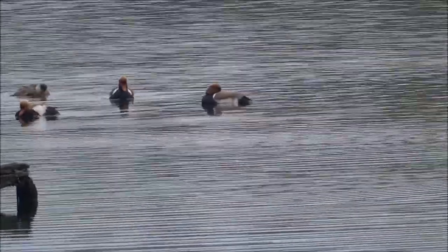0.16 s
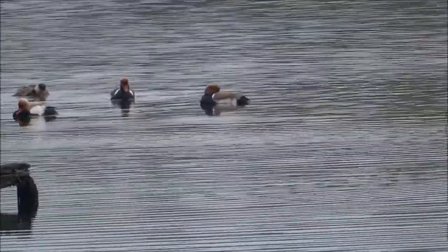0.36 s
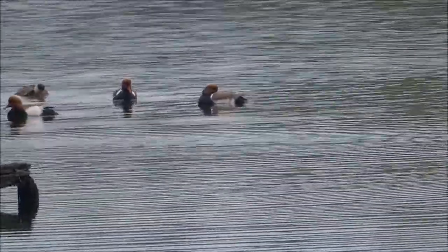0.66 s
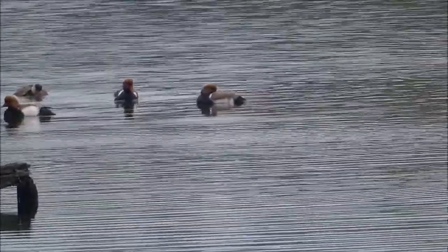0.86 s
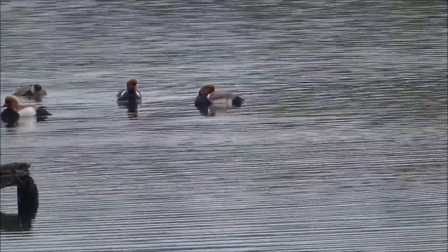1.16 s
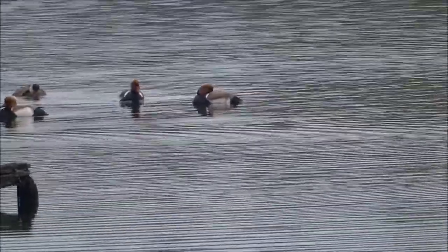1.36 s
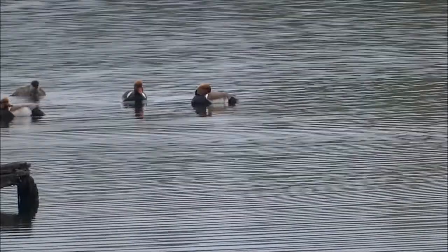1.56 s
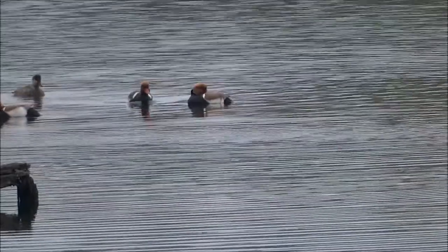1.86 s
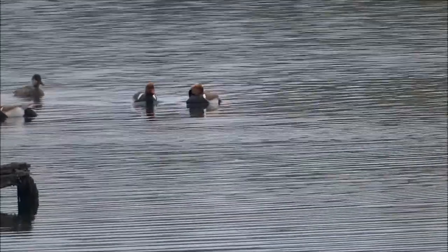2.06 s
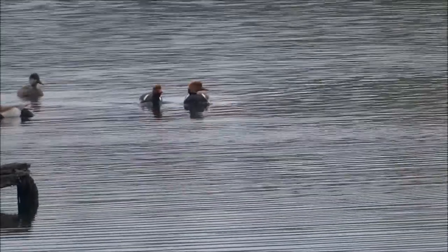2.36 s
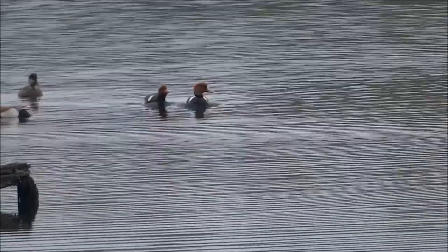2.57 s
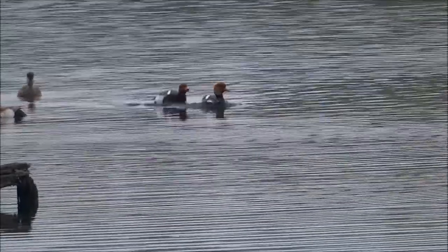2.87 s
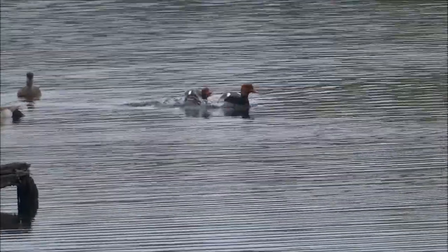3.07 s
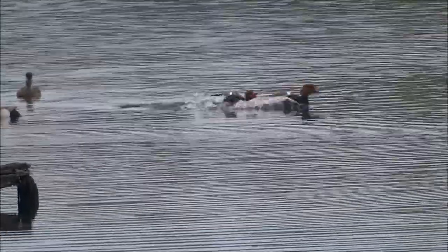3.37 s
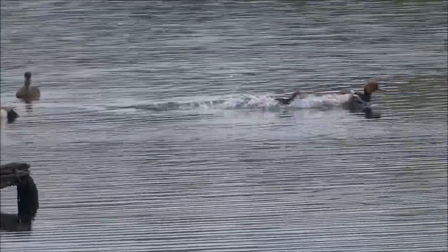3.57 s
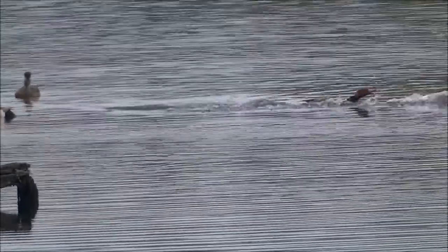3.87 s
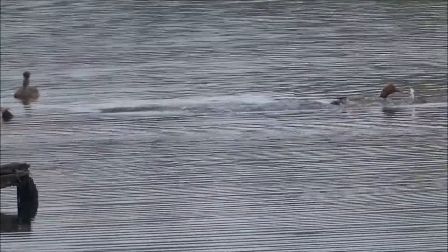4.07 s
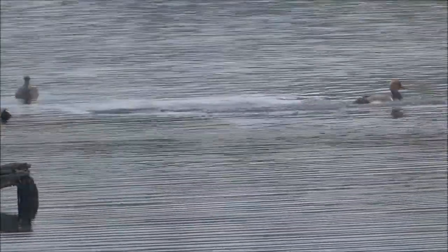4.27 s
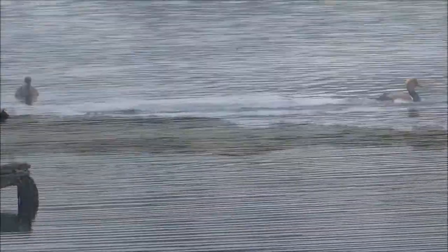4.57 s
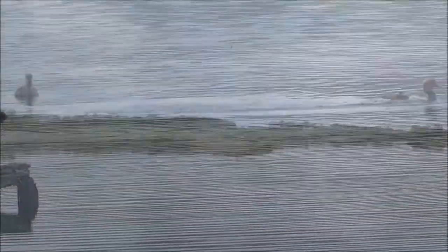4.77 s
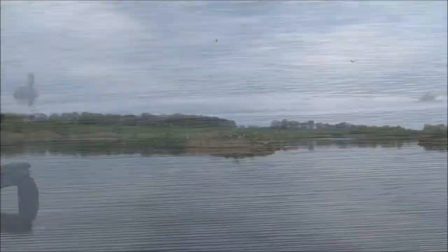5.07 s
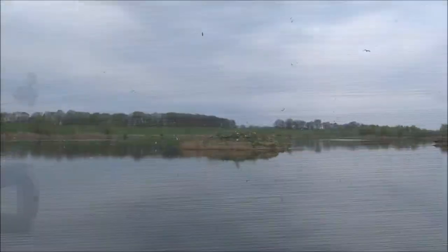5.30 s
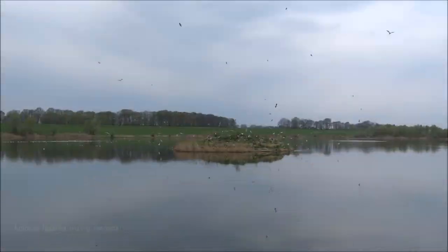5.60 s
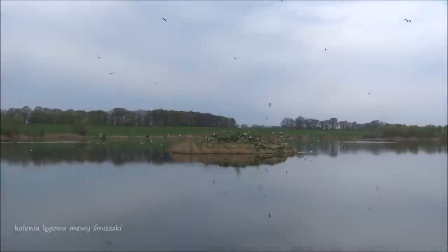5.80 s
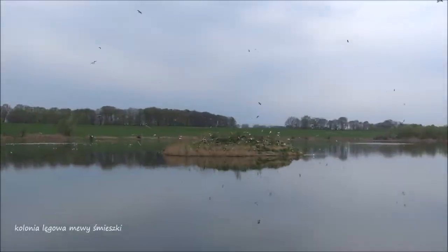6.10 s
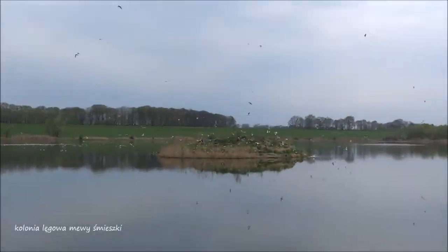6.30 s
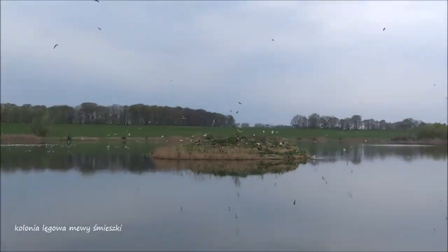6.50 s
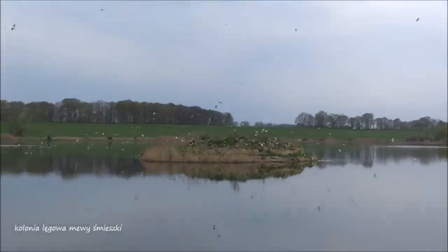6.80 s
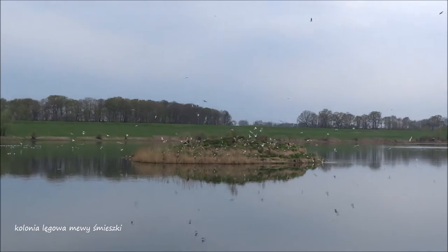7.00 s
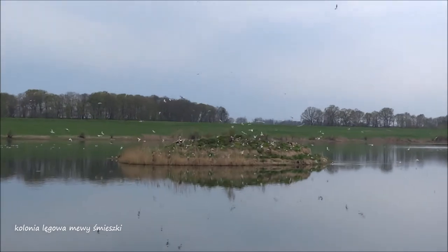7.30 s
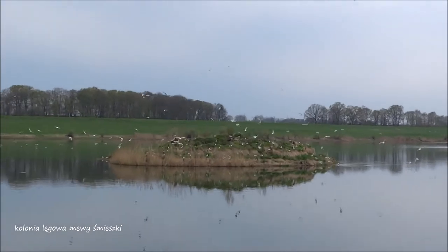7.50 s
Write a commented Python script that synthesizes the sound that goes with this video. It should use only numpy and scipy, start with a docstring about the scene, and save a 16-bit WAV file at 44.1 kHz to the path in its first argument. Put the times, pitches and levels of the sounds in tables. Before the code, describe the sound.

Gulls call continuously from a breeding island across open water, first quiet and far off, with scattered harsh cries standing out. High, soft songbird chirps and a steady thin whistle pass before the middle. Then the chorus swells within a moment, brighter and thicker, with stronger airy rush and louder nearby screeches. Fairly narrow stereo, slight left lean, faint scattered echoes from reeds and trees.

```python
"""A gull colony on a reed island, heard across a lake by two close microphones.
From the start a thin, distant chorus of overlapping rasping calls lies over low rumble and soft air noise.
Nearer gulls stand out with arched, rattling overtone cries and harsh hissing screeches; one mew droops at 1.3 s.
From 2.7 s a songbird gives five falling sine chirps, then a thin whistle on two close pitches.
Just after 4 s the chorus swells and fills out, the rush of air with it; the nearer birds echo faintly from the shore."""
import sys
import numpy as np
from scipy import signal
from scipy.fft import rfft, irfft, next_fast_len
from scipy.io import wavfile
from scipy.ndimage import uniform_filter1d

SR = 44100
rng = np.random.default_rng(int(sys.argv[2]) if len(sys.argv) > 2 else 0)


def inscribe(sig):
    """Save sig as 16-bit PCM at rate SR to the path in sys.argv[1].

    A 1-D sig is mono; a 2-D sig holds one channel per row.
    Samples are clipped to [-1, 1] before scaling.
    """
    pcm = np.round(np.clip(np.atleast_2d(sig).T, -1, 1) * 32767)
    wavfile.write(sys.argv[1], SR, pcm.astype(np.int16))


N = 337353
TIME = np.arange(N) / SR

# How hard the distant colony calls, thin and then full; only the swings about the mean are used.
# Each row: time in seconds, level in dB.
FAR_CHORUS = [(0.0, -39), (0.39, -48.5), (0.5, -44.5), (1.27, -53), (1.34, -38.5), (1.7, -46), (1.87, -49),
              (1.94, -55), (2.03, -44.5), (2.27, -41.5), (3.14, -43), (3.18, -56.5), (3.74, -43),
              (3.81, -56), (4.04, -48.5), (4.05, -48)]
FULL_CHORUS = [(4.2, -37), (5.17, -37.5), (5.66, -37.5), (5.75, -39.5), (6.87, -37), (7.01, -37),
               (7.23, -38.5), (7.49, -34), (7.65, -38)]
# Colour of the two choruses. Each row: frequency in Hz, relative level in dB per Hz.
FAR_COLOUR = [(380, -52), (550, -23), (700, -25.5), (850, -24), (1050, -13), (1280, -13.5), (1600, 1),
              (1900, 1.5), (2200, -1.5), (2500, -8), (2900, -12), (3600, -16), (4700, -15), (6500, -25),
              (8000, -34), (10500, -56)]
FULL_COLOUR = [(500, -26), (900, -15.5), (1400, -11), (1700, 1), (2150, 1), (2450, -3), (2680, -0.5),
               (3050, -4), (3550, -4), (3820, -9.5), (4120, -4.5), (4400, -13), (4650, -10.5),
               (5400, -12.5), (5700, -14), (6100, -12.5), (6600, -18.5), (7600, -19), (9200, -34),
               (11000, -36.5)]
# Air and rumble over the lake under each chorus. Each row: frequency in Hz, relative level in dB per Hz.
FAR_AIR = [(15, -43.5), (25, -17), (40, -17.5), (59, -3.5), (86, -13), (119, -8.5), (141, -16.5),
           (178, -11.5), (198, -23.5), (361, -24), (523, -9), (793, -9), (1000, -9), (1300, -8),
           (2200, -120)]
FULL_AIR = [(15, -45), (25, -18), (70, -10.5), (130, -12), (172, -21), (323, -33.5), (426, -21.5),
            (500, -5), (882, -3), (1110, -0.5), (1200, -4), (1560, 6), (2640, -120)]
# Stereo width at the microphones. Each row: frequency in Hz, gain of the side signal in dB.
WIDTH = [(50, -31), (130, -14), (330, -4.5), (700, -12), (1400, -13), (2800, -17.5), (5600, -13.5),
         (9000, -10)]
# The loudest single cries. Each row: start in seconds, length in seconds, pitch in Hz, glide and arch as
# shares of the pitch, level in dB before CRIES_DB, number of the overtone the throat lifts, rasp from 0 to 1.
CRIES = [(0.0, 0.14, 1034, -.16, 0.0083, -41.5, 2, 0.22), (.17, 0.2, 1176, -0.046, 0.04, -53, 3, 0.81),
         (0.289, .15, 1005, 0, .04, -59, 2, 0.78), (.36, .23, 1170, .17, .03, -52, 3, .6),
         (.56, .14, 950, -.04, .03, -40.5, 2, .35), (.65, .15, 850, -.06, .03, -45, 2, .5),
         (.81, 0.15, 1180, .04, 0.024, -55, 3, 0.55), (0.821, 0.12, 888, .1, 0.031, -47, 2, 1),
         (.92, 0.12, 1076, 0.094, 0.045, -42.5, 2, 0.48), (.94, 0.15, 1175, -0.0096, 0.0022, -49.5, 3, 1),
         (1.14, 0.14, 1290, -.03, 0.0024, -55, 4, .5), (1.151, 0.22, 1290, -0.052, 0.012, -52, 2, 0.53),
         (1.33, 0.1, 1057, 0, 0.076, -42, 2, 0.74), (1.72, 0.13, 970, -.03, 0.035, -43, 2, 0.77),
         (1.79, .12, 1043, .06, 0.041, -39, 2, 0.62), (1.76, .25, 1144, -.02, 0.0045, -56.5, 4, .5),
         (1.95, 0.078, 1210, 0.053, 0.028, -52, 3, 0.21), (1.99, .13, 985, 0.041, 0.012, -54, 4, 0.64),
         (2.0, 0.24, 935, 0.011, 0.034, -44, 2, 0.63), (2.17, 0.13, 1167, 0.047, .03, -47, 3, 0.82),
         (2.2, 0.17, 1017, -0.15, 0.037, -39.5, 2, 0.57), (2.37, .12, 890, -.03, 0.024, -40.5, 2, 0.66),
         (2.3, 0.22, 1276, -.02, .005, -54.5, 4, 0.41), (2.44, 0.16, 1284, 0.033, .02, -49, 2, 0.44),
         (2.56, .13, 1080, .08, .04, -38, 2, 0.92), (2.651, 0.15, 839, -.07, 0.032, -44, 2, 0.96),
         (2.78, 0.13, 930, .05, 0.026, -55, 2, 0.56), (2.934, 0.21, 950, -0.08, 0.015, -41, 2, 0.56),
         (2.96, 0.25, 1020, -.04, 0.035, -56, 4, 0.99), (3.09, 0.099, 1193, 0, 0.031, -57, 4, 0.58),
         (3.17, 0.096, 1044, -.28, 0.043, -49, 3, 0.69), (3.269, 0.33, 1040, .03, .02, -59, 4, 0.58),
         (3.299, 0.18, 986, -.04, 0.03, -47.5, 2, 1), (3.53, 0.16, 955, 0, 0.046, -42, 2, 0.9),
         (3.66, 0.21, 888, -0.11, .01, -47.5, 2, 0.15), (3.77, 0.12, 1207, .03, .02, -54, 3, 0.35),
         (3.84, 0.083, 1216, -.09, 0.029, -47, 3, 0.56), (3.849, 0.054, 1224, 0.018, 0.094, -45, 2, 0.97),
         (3.88, 0.19, 773, -.05, 0.0068, -51.5, 2, 0.54), (3.9, .19, 1140, .1, .03, -50.5, 3, .5),
         (4.05, .12, 1010, -.1, .02, -38, 2, .45), (4.14, .23, 890, -.1, .01, -35, 2, .55),
         (4.17, 0.31, 1446, -0.039, 0.023, -44, 3, 0.77), (4.2, 0.17, 1200, 0, 0.028, -47, 4, .5),
         (4.33, 0.2, 1330, -.01, .005, -39, 2, 0.39), (4.33, 0.13, 1340, 0, .005, -45, 4, 0.47),
         (4.421, .18, 1437, .02, 0.022, -46, 3, .44), (4.57, 0.15, 1413, -.02, .01, -46, 3, 0.35),
         (4.609, .12, 1056, 0, 0.039, -37, 2, 0.87), (4.751, 0.15, 1095, -0.019, 0.023, -42, 3, 0.69),
         (4.87, 0.16, 1333, -0.051, 0.0093, -38, 2, 0.26), (4.9, 0.093, 1240, -.01, 0.0044, -51, 5, 0.44),
         (5.12, 0.16, 1114, -0.031, 0.013, -45, 3, .8), (5.27, 0.16, 1074, -0.1, 0.014, -33, 2, 0.65),
         (5.36, 0.19, 1370, 0.0051, 0.0097, -39, 3, 0.8), (5.565, .135, 1105, 0, .07, -32, 2, .65),
         (5.71, 0.057, 1173, 0, 0.028, -41, 3, .4), (5.79, 0.24, 1360, -.02, 0.024, -51, 3, 0.5),
         (5.83, 0.16, 1175, 0, 0.03, -41, 3, 0.81), (5.95, 0.34, 1167, 0.016, 0.03, -40.5, 3, 0.79),
         (6.03, 0.16, 1273, 0, .01, -46, 4, .5), (6.18, 0.1, 1335, 0, 0, -45, 4, .5),
         (6.194, 0.079, 1200, -0.044, 0.041, -36, 2, 0.59),
         (6.25, 0.26, 1320, -0.016, 0.013, -40.5, 2, 0.83), (6.38, .2, 1352, -.038, .01, -41.5, 3, .5),
         (6.425, .05, 1080, .08, .06, -35, 2, .35), (6.44, .15, 1250, 0, .02, -47, 4, .6),
         (6.51, .05, 1045, -.04, .05, -37.5, 2, .35), (6.605, .05, 1150, .16, 0.026, -41, 2, 0.25),
         (6.62, 0.24, 1350, .02, 0.02, -50, 4, .6), (6.685, .045, 1060, -.1, 0.024, -40, 2, .35),
         (6.73, .26, 1195, .02, .015, -43.5, 3, .75), (6.87, .15, 1360, .02, .005, -47, 4, .4),
         (6.95, .16, 1345, .03, .01, -40.5, 3, .4), (6.95, .15, 1000, -.1, .03, -33.5, 2, .55),
         (7.105, .08, 1085, 0, .036, -34, 2, .55), (7.08, 0.11, 1365, -.03, 0.029, -44, 3, 0.4),
         (7.32, 0.12, 1072, .04, 0.024, -34, 2, 0.94), (7.35, 0.18, 1365, 0, .01, -47.5, 4, 0.44),
         (7.44, 0.074, 1090, 0.016, 0.028, -34.5, 2, 0.47), (7.47, 0.18, 1000, -.02, 0.015, -39, 2, 0.43)]
# Overtones of a screech, and weakly of a cry. Each row: frequency in Hz, relative level in dB.
VOICE = [(300, -40), (550, -26.5), (1100, -22.5), (2200, -7), (2900, 0), (3500, -9.5), (4200, -7.5),
         (5000, -7.5), (6000, -6), (6700, -14.5), (7300, -14.5), (8500, -22.5), (10500, -45.5)]
# Fall-off of a cry's upper resonance in the high treble. Each row: frequency in Hz, gain in dB.
BEAK_ROLLOFF = [(5400, -7.5), (7000, -13), (9500, -30)]
# Harsh screeches close by. Each row: start in seconds, length in seconds, pitch in Hz, glide and arch as
# shares of the pitch, level in dB, treble tilt in dB, rasp from 0 to 1, jitter as a share of the pitch.
SCREECHES = [(0.391, 0.2, 1207, 0.085, 0.005, -43, -1, 0.74, 0.008),
             (1.109, 0.19, 1287, -0.01, 0.014, -56, 13, 0.94, 0.011),
             (1.28, 0.27, 1197, -0.069, 0.0104, -46.5, -2, 0.73, .02),
             (2.165, 0.18, 1257, 0.048, 0.041, -42.5, 0.5, 0.65, 0.013),
             (2.258, .13, 1315, -0.012, 0.0088, -44, 7, 0.61, 0.022),
             (2.521, 0.15, 1286, 0.0037, 0.017, -48, -10, 0.72, 0.023),
             (2.925, 0.21, 1128, 0.043, 0.016, -45, -17, 0.78, 0.031),
             (3.082, .18, 1185, 0.062, 0.01, -44.5, -1.5, 0.64, 0.018),
             (3.923, 0.21, 1187, .05, 0.02, -47, 5, 0.81, 0.013),
             (4.14, 0.26, 1075, -0.021, .016, -44, 8, 0.58, 0.027),
             (4.737, 0.204, 1093, .01, 0.015, -37, -12, 0.93, 0.0303),
             (5.381, 0.18, 1318, -0.012, 0.019, -34, -10, 0.61, 0.11),
             (6.136, 0.26, 1308, -0.00089, 0.015, -40, -1, 0.64, 0.046),
             (6.77, 0.28, 1203, -0.00039, 0.015, -37, -15, 0.67, 0.046),
             (7.346, .15, 1188, 0.042, 0.015, -40.5, 7, 0.42, 0.04)]
# One long drooping mew. The row: start in seconds, length in seconds, pitch at the start, middle and end
# in Hz, level in dB before it fades.
MEW = (1.33, .46, 1090, 1120, 925, -42)
# Overtones of the mew. Each row: frequency in Hz, relative level in dB.
MEW_VOICE = [(300, -55), (550, -30), (1100, -7.5), (1700, -18), (2250, -1), (3400, -15), (4500, -11),
             (5700, -18), (9000, -55)]
# The songbird's falling chirps. Each row: start in seconds, level in dB before fading in and out.
CHIRPS = [(2.715, -59), (2.868, -54), (3.030, -51), (3.179, -51), (3.340, -54.5)]
# The full chorus swells in between these two times in seconds.
SWELL_S = (4.042, 4.143)

FAR_AIR_DB, FULL_AIR_DB = -64, -45.6
RATTLE_HZ = 66.84  # mean rate at which a rasping voice is chopped
STIR_DB, STIR_S = 3.5, 0.18  # a screech stirs the thin chorus: its treble rises for a moment
CRIES_DB = -0.9  # distance softens all the cries alike
FLUTTER_DB, FLUTTER_PER_S = 1.5, 60  # a cry's level flutters on its way across the water
SCREECH_HISS = 0.47  # share of the tone
MEW_TREMBLE_DB, MEW_FADE_DB_PER_S = 3, 13
WHISTLE_START_S, WHISTLE_LENGTH_S, WHISTLE_ATTACK_S, WHISTLE_RELEASE_S = 3.46, 0.59, 0.05, 0.14
WHISTLE_HZ, WHISTLE_GAP_HZ, WHISTLE_WAVER = 4985, 170, 0.0045  # waver as a share of the pitch
WHISTLE_DB, WHISTLE_LOWER_DB = -53.5, -2.5  # peak of the upper voice; the lower voice relative to it
CUTOFF_HZ = 11000


def from_db(db):
    """Decibels to gain."""
    return 10 ** (np.asarray(db) / 20)


def rms_one(x):
    """Scale to unit power."""
    return x / np.sqrt(np.mean(x ** 2) + 1e-20)


def at_hz(points, hz):
    """Read a spectrum on a log-frequency axis."""
    f, value = np.transpose(points)
    return np.interp(np.log(hz + 1e-3), np.log(f), value)


def colour(x, spectrum):
    """Give a steady sound a spectrum."""
    size = next_fast_len(N + 4096)
    gain = from_db(at_hz(spectrum, np.fft.rfftfreq(size, 1 / SR)))
    return irfft(rfft(x, size) * gain, size)[..., :N]


def band(x, low_hz, high_hz):
    """Band-pass."""
    return signal.sosfilt(signal.butter(2, [low_hz, high_hz], "band", fs=SR, output="sos"), x)


def wobble(t, per_s, size=1024):
    """Smooth chance with per_s new values a second."""
    return np.interp(t * per_s, np.arange(size), rng.standard_normal(size))


def add(track, s, sound):
    """Mix a sound in at time s, cut to the track's ends."""
    at = int(round(s * SR))
    first, last = max(at, 0), min(at + sound.shape[-1], N)
    if last > first:
        track[..., first:last] += sound[..., first - at:last - at]


def shore(x, t60, size=40000):
    """Sound scattered back by reeds and trees: a dense dying tail, different on each side."""
    tail = rng.standard_normal((2, size)) * from_db(-60 * np.arange(size) / SR / t60)
    return signal.fftconvolve(x[None], rms_one(tail) / np.sqrt(size), axes=1)[:, :N]


def widen(mid, side, left_db):
    """Two close microphones: nearly the same sound in both, the left louder by left_db."""
    return (mid + colour(side, WIDTH) * [[1], [-1]]) * from_db([[left_db / 2], [-left_db / 2]])


def arch(pitch_hz, glide, bend):
    """Pitch at start, middle and end: bend lowers both ends, glide tilts the line through them."""
    return pitch_hz * np.array([1 - bend - glide / 2, 1, 1 - bend + glide / 2])


def cry(length, pitches, rasp, throat, jitter, hoarse, half_db, edge, hiss=0):
    """One gull call: an arched overtone-rich tone; rasp chops it into a rattle, shakes it and makes it hoarse."""
    t = np.arange(int(max(length, .02) * SR)) / SR
    u = t / t[-1]
    rasp = np.clip(rasp, .02, 1)
    shake = jitter * rasp * (wobble(t, 498.0) + 0.5715 * wobble(t, 69.85))
    pitch = np.polyval(np.polyfit([0, .5, 1], pitches, 2), u) * (1 + shake)

    # the syrinx alternates strong and weak cycles, so the wave repeats at half the pitch
    k = np.arange(1, 21)
    strength = from_db(throat(k * pitches[1] / 2) + k % 2 * half_db)
    random_phase = np.exp(2j * np.pi * rng.random(len(k)))
    cycle = irfft(np.r_[0, strength * random_phase], n=4096)
    place = np.cumsum(pitch) / SR / 2 % 1
    tone = cycle[(place * len(cycle)).astype(int)]
    if hiss:
        throat_gain = from_db(throat(np.fft.rfftfreq(len(t), 1 / SR)))
        rush = irfft(rfft(rng.standard_normal(len(t))) * throat_gain, len(t))
        tone = rms_one(tone) + hiss * rms_one(rush)

    rate_hz = RATTLE_HZ * (1 + 0.047 * rng.standard_normal())
    beat = rate_hz * t + 0.15 * wobble(t, 36.5) + rng.random()
    rattle = 1 + 0.92 * rasp * np.cos(2 * np.pi * beat)
    roughness = 1 + hoarse * rasp ** 2 * wobble(t, 1100)
    swell = np.sin(np.pi / 2 * np.clip(np.minimum(u, 1 - u) / edge, 0, 1)) ** 2
    return rms_one(tone * rattle * roughness) * swell


def crowd(t0, t1, spread_db, rasp, wet_db, t60, throat_db, count, size=6):
    """Many gull calls, long and short, at varied levels and bearings, each with its own voice, as mid and side."""
    out = np.zeros((size, 2, N))
    for i, chances in enumerate(rng.random((count, 9))):
        when, span, key, rise, fall, harsh, near, bearing, gape = chances
        pitch_hz = 820 * (1450 / 820) ** key
        pitches = pitch_hz * np.array([1.04 - .26 * rise, 1, 1.01 - .22 * fall])

        def throat(hz):
            """Each bird holds its main resonance at another height."""
            centre_hz = 1600 * (5500 / 1600) ** gape
            return throat_db * np.exp(-(np.log2(hz / centre_hz) / 0.22) ** 2)  # width in octaves

        voice = cry(.08 + .24 * span, pitches, rasp + .5 * (harsh - .5), throat,
                    jitter=0.02467, hoarse=2.54, half_db=-3.5, edge=0.15)
        seat = np.array([[1], [np.sqrt(3) * (2 * bearing - 1)]])
        start_s = t0 + (t1 - t0) * (i + when) / count
        add(out[i % size], start_s, voice * from_db(spread_db * near) * seat)
    # each part of the colony has its own paths off the shore
    return sum(part + from_db(wet_db) * shore(part[0], t60, size=20000) for part in out)


def held(x, low_hz, high_hz):
    """Bring mid and side to a steady unit level, judged by the mid's power in a band."""
    power = uniform_filter1d(band(x[0], low_hz, high_hz) ** 2, SR // 5)
    return x / np.sqrt(np.maximum(power, 0) + 1e-3 * power.mean())


def chorus(voices, spectrum, curve, stirred_db, body_db, treble_db, body_follows, treble_follows, left_db):
    """The colony's din: throat resonance and harsh treble, each following how hard the birds call."""
    s, effort_db = np.transpose(curve)
    swing_db = np.interp(TIME, s, effort_db) - np.mean(effort_db)
    din = colour(voices, spectrum)
    low = colour(din, [(2600, 0), (3000, -6), (3600, -40)])
    body, treble = held(low, 1300, 2800), held(din - low, 2800, 5000)
    body = body * from_db(body_db + body_follows * swing_db)
    treble = treble * from_db(treble_db + treble_follows * swing_db + stirred_db)
    return widen(*(body + treble), left_db)


def air(spectrum, level_db, left_db):
    """Distant rumble and the soft rush of air over water and reeds: coloured noise."""
    mid, side = rms_one(colour(rng.standard_normal((2, N)), spectrum))
    return from_db(level_db) * widen(mid, side, left_db)


def near_cries():
    """Single birds above the din: arched cries with one overtone lifted by the throat."""
    out = np.zeros(N)
    for s, length, pitch_hz, glide, bend, db, overtone, rasp in CRIES:
        def throat(hz):
            """A main resonance, a weaker one an octave up, the fundamental and weak overtones."""
            def ring(multiple):
                """A resonance at this multiple of the pitch."""
                octaves = np.log2(hz / (multiple * pitch_hz))
                return 1 / (1 + (octaves / 0.099) ** 4)

            main = ring(round(overtone))
            upper = ring(2 * round(overtone)) * from_db(-12 + at_hz(BEAK_ROLLOFF, hz))
            fundamental = ring(0.91) * from_db(-19)
            overtones = from_db(-20 + at_hz(VOICE, hz))
            return 20 * np.log10(main + upper + fundamental + overtones)

        voice = cry(length, arch(pitch_hz, glide, bend), rasp, throat,
                    jitter=0.0221, hoarse=.8, half_db=-20, edge=.27)
        flutter_db = FLUTTER_DB * wobble(np.arange(len(voice)) / SR, FLUTTER_PER_S)
        add(out, s, from_db(db + CRIES_DB + flutter_db) * voice)
    return out


def screeches():
    """The closest gulls use the whole stack of overtones, with a puff of hiss in each beat of the rattle."""
    out = np.zeros(N)
    for s, length, pitch_hz, glide, bend, db, treble_db, rasp, jitter in SCREECHES:
        def beak(hz):
            """A wider beak lets out more treble."""
            return at_hz(VOICE, hz) + treble_db * at_hz([(2400, 0.16), (6000, 1.0)], hz)

        voice = cry(length, arch(pitch_hz, glide, bend), rasp, beak,
                    jitter=jitter, hoarse=.5, half_db=-13, edge=.33, hiss=SCREECH_HISS)
        add(out, s, from_db(db) * voice)
    return out


def stir():
    """Excitement of the neighbours, 0-1: a smooth bump around each screech."""
    bumps = [np.exp(-((TIME - s - length / 2) / STIR_S * 2) ** 2) for s, length, *_ in SCREECHES]
    return np.minimum(sum(bumps), 1)


def drooping_mew():
    """One nearer gull's long call: its pitch droops while its level trembles and weakens."""
    out = np.zeros(N)
    s, length, start_hz, middle_hz, end_hz, db = MEW
    voice = cry(length, (start_hz, middle_hz, end_hz), 0.52, lambda hz: at_hz(MEW_VOICE, hz),
                jitter=.026, hoarse=0.4, half_db=-19, edge=0.15, hiss=.28)
    age = np.arange(len(voice)) / SR
    level_db = db - MEW_FADE_DB_PER_S * age + MEW_TREMBLE_DB * wobble(age, 32.3)
    add(out, s, from_db(level_db) * voice)
    return out


def songbird(length=0.059, top_hz=7300, bottom_hz=5950):
    """Sine voices, slightly unsteady: five downward chirps, then a whistle that swells, holds and fades."""
    out = np.zeros(N)
    u = np.linspace(0, 1, int(length * SR))
    sweep_hz = top_hz * (bottom_hz / top_hz) ** u
    for s, db in CHIRPS:
        phase = 2 * np.pi * np.cumsum(sweep_hz * (1 + 0.012 * wobble(u * length, 260))) / SR
        add(out, s, from_db(db) * rms_one(np.sin(phase) * np.sin(np.pi * u ** 1.45)))

    waver = 1 + WHISTLE_WAVER * wobble(TIME, 28)  # shared by both voices

    def whistle(hz):
        """One voice with its own fine shake."""
        shaken_hz = hz * waver * (1 + 0.0026 * wobble(TIME, 120))
        return np.sin(2 * np.pi * np.cumsum(shaken_hz) / SR)

    age = TIME - WHISTLE_START_S
    ramps = np.minimum(age / WHISTLE_ATTACK_S, (WHISTLE_LENGTH_S - age) / WHISTLE_RELEASE_S)
    pair = whistle(WHISTLE_HZ) + from_db(WHISTLE_LOWER_DB) * whistle(WHISTLE_HZ - WHISTLE_GAP_HZ)
    return out + np.clip(ramps, 0, 1) * from_db(WHISTLE_DB) * pair


def scene():
    """The thinner chorus gives way to the full one; nearer birds echo faintly from the shore."""
    few = crowd(-.5, 4.3, spread_db=10, rasp=0.56, wet_db=-4, t60=0.45, throat_db=5, count=150)
    many = crowd(3.6, 7.8, spread_db=10, rasp=0.58, wet_db=-3, t60=0.5, throat_db=5, count=190)
    far = chorus(few, FAR_COLOUR, FAR_CHORUS, STIR_DB * stir(), body_db=-41.5, treble_db=-52.5,
                 body_follows=0.3, treble_follows=0.21, left_db=.5)
    full = chorus(many, FULL_COLOUR, FULL_CHORUS, 0, body_db=-34.5, treble_db=-39.5,
                  body_follows=1.0, treble_follows=0.2, left_db=0.8)
    far = far + air(FAR_AIR, FAR_AIR_DB, left_db=0.5)
    full = full + air(FULL_AIR, FULL_AIR_DB, left_db=1.8)
    swell = np.interp(TIME, SWELL_S, [0, 1])
    distant = np.sqrt(1 - swell) * far + swell * full

    close = screeches()
    birds = near_cries() + drooping_mew() + songbird()
    echo = shore(from_db(-8) * birds + from_db(-12) * close, t60=0.36)
    return distant + widen(birds + close + echo[0], echo[1], left_db=1.5)


def record(dry):
    """A steep low-pass cuts the top of what the microphones hear."""
    return signal.sosfilt(signal.ellip(12, .1, 80, CUTOFF_HZ, fs=SR, output="sos"), dry)


dry = scene()
out = record(dry)
inscribe(out)
```